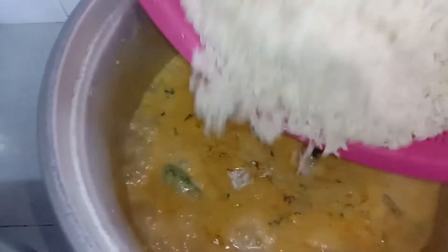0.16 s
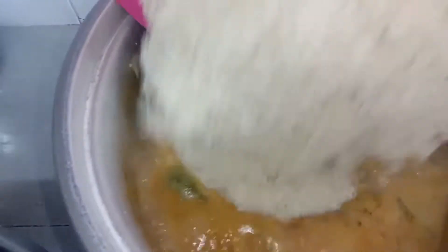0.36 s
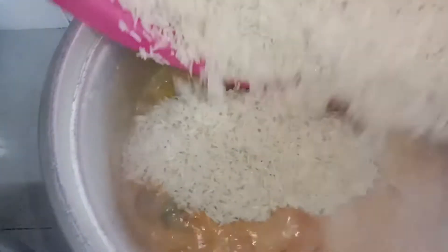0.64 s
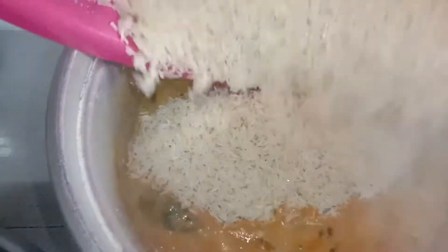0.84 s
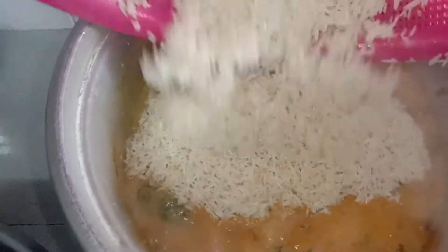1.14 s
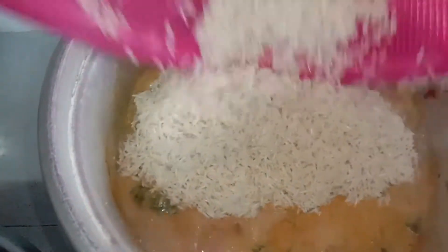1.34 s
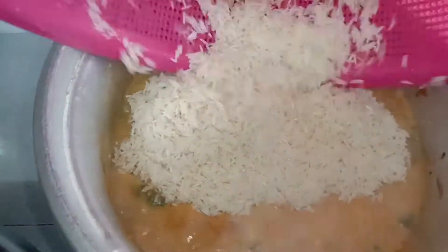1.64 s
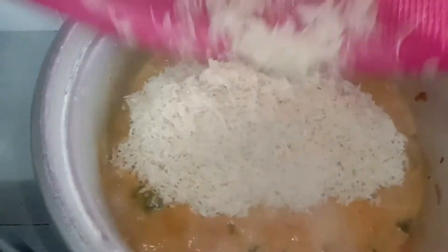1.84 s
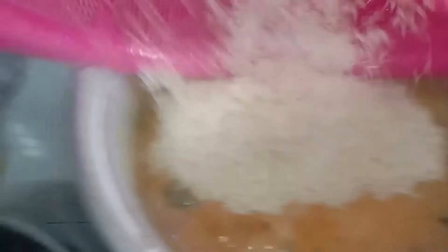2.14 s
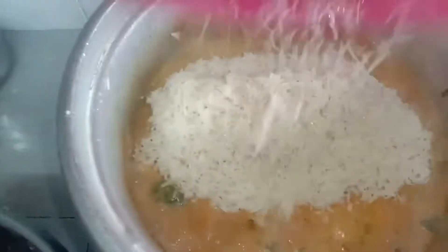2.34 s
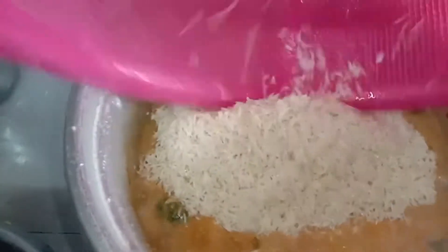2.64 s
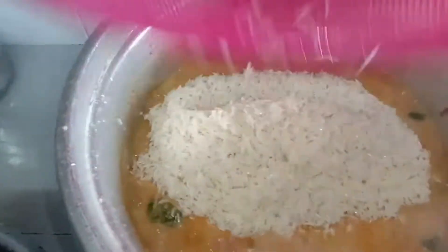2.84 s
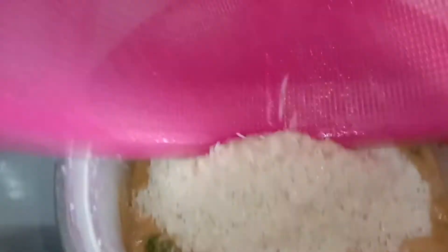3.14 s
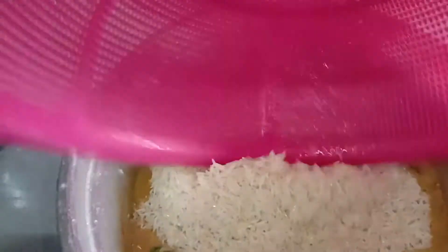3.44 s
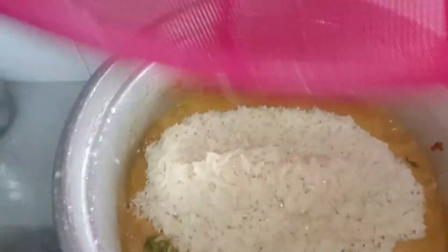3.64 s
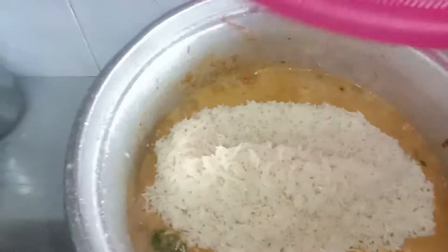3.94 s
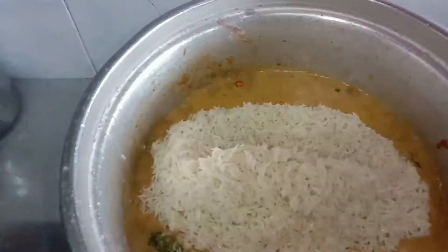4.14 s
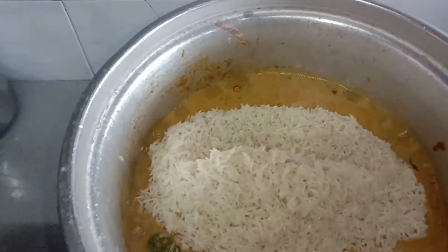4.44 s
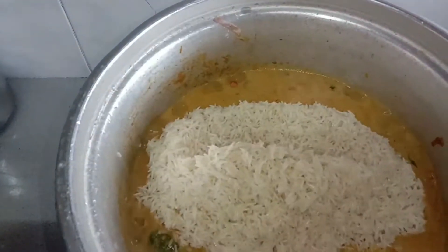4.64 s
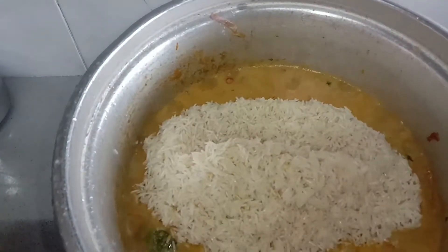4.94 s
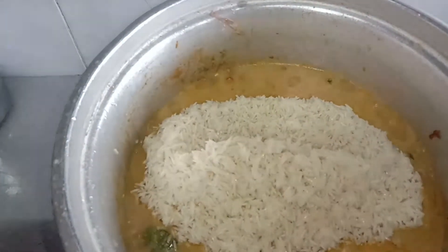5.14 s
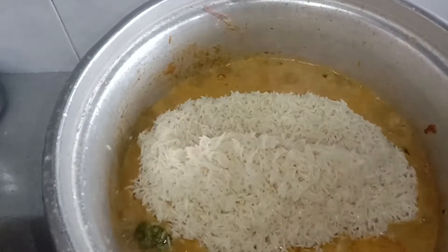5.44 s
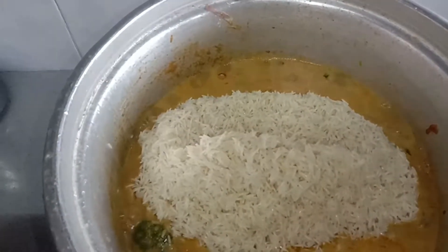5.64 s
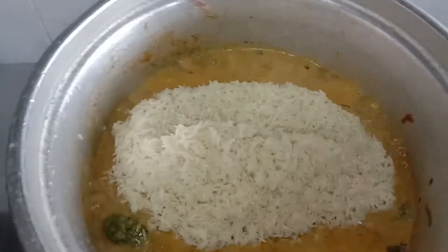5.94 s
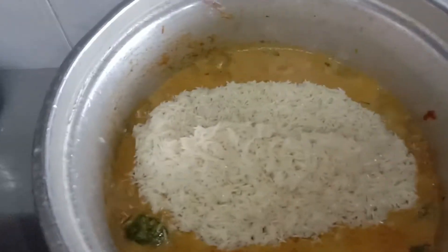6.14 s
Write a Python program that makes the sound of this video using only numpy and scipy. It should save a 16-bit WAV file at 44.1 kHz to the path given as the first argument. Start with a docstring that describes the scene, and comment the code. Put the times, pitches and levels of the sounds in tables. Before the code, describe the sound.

A plastic colander is knocked repeatedly on a metal pot as wet rice slides into boiling broth, then set down with a clatter.

```python
"""Knocking rice into boiling broth

Soaked rice slides from a plastic colander into a big metal pot of broth on a rushing gas flame.
The colander is knocked on the pot about four times a second; the knocks ring the pot and shake grains
loose. Then it is put down with a clatter in the small, echoing kitchen, while bubbles plop on."""
import sys
import numpy as np
from scipy import signal
from scipy.fft import rfft, irfft
from scipy.io import wavfile
from scipy.ndimage import uniform_filter1d, minimum_filter1d, map_coordinates

SR = 44100
rng = np.random.default_rng(int(sys.argv[2]) if len(sys.argv) > 2 else 0)


def waveform_to_disk(signal):
    """Save audio, clipped to [-1, 1], as 16-bit WAV at the path in sys.argv[1]."""
    frames = np.transpose(np.atleast_2d(signal))
    scaled = np.clip(frames, -1, 1) * 32767
    samples = np.round(scaled).astype(np.int16)
    wavfile.write(sys.argv[1], SR, samples)


N = 277385
T = np.arange(N) / SR

# Levels are relative: each sound is shaped further. A fade time (t60) is the time to fall by 60 dB.
# The kitchen's echo. Each row: frequency in Hz, fade time in seconds.
ECHO_FADES = [(100, 0.47), (400, 0.54), (1200, 0.52), (3000, 0.52), (7000, 0.47), (14000, 0.4)]
# The tone of each sound. Each row: frequency in Hz, level in dB.
FLAME_TONE = [(25, -40), (60, -14), (110, -14), (240, -7), (420, -2), (650, -6), (1250, -21), (1700, -12),
              (2900, -13), (4200, -19.5), (6300, -24), (7600, -25), (10500, -28), (15500, -52)]
CLATTER_TONE = [(45, -31), (125, -0.5), (260, 0.5), (700, 3.5), (1280, 6), (2200, -7), (2900, -5.5),
                (4300, -15), (5500, -16), (6500, -20.5), (10000, -30.5), (13000, -39), (15500, -36)]
SLIDING_RICE_TONE = [(150, -28), (300, -2.5), (430, 1.5), (620, -10), (1000, -5), (1270, -1.5),
                     (1550, -13.5), (3300, -5), (7000, -15), (10000, -15), (13000, -35), (15500, -63)]
GRAIN_TONE = [(300, -10), (1200, 9), (3000, -0.5), (5500, 4), (10000, -3.5), (13000, -7), (15500, -5.5)]
CRACK_TONE = [(35, -57), (60, -22.5), (335, 0.5), (688, -4), (1230, 4.5), (1550, -5), (3050, 3),
              (5580, -4.5), (6260, -4.5), (7370, -12), (9970, -15), (13500, -25.5), (15500, -27)]
CRACK_ECHO_TONE = [(40, -21.5), (120, 8), (260, -0.5), (520, 3), (800, 1), (1100, -1), (1280, 13.5),
                   (1500, -3), (2000, 2.5), (3000, 3.5), (5300, -1.5), (9500, -13), (13300, -24.5),
                   (15500, -26)]
MIC_TONE = [(4800, 0), (5600, 0.5), (6300, -1), (7200, 1.5), (10500, 2.7), (13500, -4.5), (15100, 4.5),
            (16000, -2), (19000, 0.5)]
# Bands of pitch that a thing favours or weakens. Each row: centre in Hz, width in Hz, level in dB.
HOLLOW_BANDS = [(428, 45, -61.5), (955, 45, -63.5), (1270, 90, -57.5)]  # hollows in and under the pot
FLUTTER_BANDS = [(84, 21, -12), (114, 20.5, -0.5), (161, 20, -4.5)]  # the flame's low flutter
BOWL_BANDS = [(1255, 73, 8), (1945, 64, 1.5), (2270, 80, -10), (3040, 170, -10), (5050, 180, -9),
              (5600, 290, -10.5), (7200, 370, -5)]  # the inside of the pot
PLASTIC_BANDS = [(1360, 54, -2), (1630, 80, -3), (2030, 40, 0), (2970, 100, 0), (3580, 40, 1),
                 (4770, 72, 1), (5410, 94, 1)]  # the colander being set down
MIC_DIPS = [(4450, 170, -2.5), (6230, 300, -4), (8010, 570, -6)]
# The notes a struck thing rings with. Each row: pitch in Hz, level in dB, fade time in seconds.
WORKTOP_NOTES = [(129, 0, 0.19), (307, -5, 0.14), (420, -13, 0.25), (560, -12, 0.12), (673, -8, 0.13)]
UTENSIL_NOTES = [(1710, 0.5, 0.16), (2700, -16.5, 0.29), (5040, -9, 0.057), (9100, -40, 0.16),
                 (10300, -41, 0.22)]
TAPPED_POT_NOTES = [(1933, -12, 0.13), (2300, -11, 0.08), (3020, 2, 0.036), (5000, -4.5, 0.04)]
KNOCKED_POT_NOTES = [(495, -8, .42), (925, -11, .3), (1038, -8, .38), (1288, -7, .36), (1660, -13, .4),
                     (1911, -8, .42), (1934, -1, .5), (2088, -12, .35), (2356, -1, .3), (2642, -11, .25),
                     (2702, -11, .25), (2983, -1, .32), (3182, -14, .5), (4070, -12, .45), (4883, -10, .28),
                     (5033, -11, .35), (5254, -11, .27), (5736, -13, .3), (6643, -13, .33)]
# How strongly the flame flutters. Each row: time in seconds, level in dB.
FLUTTER_LEVELS = [(0.0, -56.5), (0.52, -60), (0.8, -61), (3.45, -53), (3.77, -50), (3.91, -55), (4.68, -59),
                  (5.16, -57), (5.85, -49), (6.07, -52.5), (6.29, -71.5)]
# Short sounds with a pitch. Each row: start in seconds, level in dB, pitch in Hz, fade time in seconds.
PLOPS = [(0.062, -28.5, 880, 0.036), (0.071, -33, 2400, 0.025), (0.266, -26.5, 1145, 0.014),
         (3.769, -39, 810, 0.034), (3.948, -36, 775, 0.038), (4.011, -32, 670, 0.037),
         (4.017, -40.5, 1280, .025), (4.037, -35, 908, 0.09), (4.129, -33.5, 832, 0.13),
         (4.270, -38, 650, .03), (4.401, -37, 460, 0.065), (4.419, -35, 1420, 0.037),
         (4.423, -35, 610, 0.031), (4.754, -39, 830, 0.041), (5.457, -36, 740, 0.054),
         (5.819, -32, 800, 0.033), (5.826, -36, 1400, .03), (5.950, -33.5, 1196, 0.03),
         (5.958, -35, 860, 0.026), (6.059, -37, 710, 0.046), (6.071, -38, 940, .03),
         (6.092, -34, 1440, 0.03), (6.101, -33.5, 1740, 0.037), (6.1614, -18, 1174, 0.01),
         (6.183, -37, 1370, 0.023)]  # big bubbles bursting
SLOPS = [(0.645, -46.5, 1230, 0.13), (0.931, -23, 990, 0.34), (1.751, -27, 1090, 0.17),
         (3.99, -51.5, 680, 0.97), (4.113, -34, 1030, 0.2), (4.385, -46.5, 480, 0.23),
         (4.398, -47, 990, 0.2), (4.925, -34, 880, 0.15), (5.057, -34.5, 1320, 0.23),
         (5.938, -49, 900, 0.38), (6.016, -45.5, 534, 0.53), (6.088, -46, 1430, 0.16),
         (6.225, -44.5, 990, 0.19)]  # rice sinking in and broth boiling up
SIZZLES = [(3.912, -60.5, 3720, 0.2), (3.915, -67, 5500, 0.18), (3.965, -60.5, 5400, 0.22),
           (4.10, -60, 7600, .45), (4.255, -58, 3670, .2), (4.32, -68, 7300, .5), (4.54, -64, 5200, .4),
           (4.654, -64, 5400, 0.21), (4.66, -65, 7500, 0.16), (5.062, -60.5, 10200, 0.57),
           (5.851, -65.5, 5640, 0.5), (5.908, -60, 4400, .06), (5.952, -61, 4160, .07),
           (5.98, -57.5, 2750, 0.97), (5.985, -58, 3300, 0.33), (6.10, -60, 3840, 0.19),
           (6.182, -53, 2560, 0.071)]  # froth on the hot pot wall
BUMPS = [(4.919, -25.5, 564, 0.11), (5.113, -28, 680, .1), (5.123, -25, 124.6, 0.24),
         (5.168, -28.5, 296, .14), (5.205, -37.5, 421, .25), (5.24, -34, 285, .09), (5.642, -37, 421, .25),
         (5.678, -30, 725, .14)]  # hollow kitchenware being shifted
# Small single events. Each row: start in seconds, level in dB.
CLINKS = [(5.548, -25)]  # a utensil
LUMPS = [(0.297, -31), (0.34, -34), (0.429, -40), (0.527, -37), (0.596, -41), (0.9894, -29), (1.0034, -26),
         (1.009, -28), (1.039, -23.5), (1.066, -22.5), (1.08, -20), (1.168, -31), (1.259, -24.5),
         (1.2709, -24.5), (1.3212, -27.5), (1.349, -33), (1.404, -17), (1.458, -24.5), (1.511, -29),
         (1.529, -24), (1.54, -22), (1.553, -24), (1.576, -27), (1.59, -28.5), (1.605, -31), (1.614, -32),
         (1.7508, -17.5), (1.799, -28), (1.823, -26), (1.8282, -22.5), (1.843, -30), (1.873, -29.5),
         (1.989, -21), (2.009, -20), (2.025, -24), (2.054, -25), (2.061, -23), (2.104, -26), (2.267, -31),
         (2.311, -28), (2.3235, -24), (2.356, -30.5), (2.55, -28), (2.579, -19.5), (2.5858, -23)]  # wet lumps of rice landing
TAPS = [(0.297, -32.5)]  # light ticks on the pot
PUFFS = [(1.6433, 2.5), (2.4189, -1)]  # air from the colander hitting the microphone
# Things set down. Each row: start in seconds, then level, bass and treble in dB,
# fade time in seconds, then echo share and worktop level in dB.
SET_DOWNS = [(4.081, -46, 2, -6, 0.2, -12, -49), (4.838, -22, -27.5, 13.5, 0.23, -9, -44.5),
             (4.919, -25.5, -3, -28, 0.068, -2, -40), (5.113, -27.5, -2, 11, 0.16, -7.5, -35),
             (5.123, -27.5, 19.5, -5, 0.1, -2, -29.5), (5.173, -33.5, 14, 11, 0.11, -9, -38),
             (5.21, -25, 7, -2, 0.076, -11, -42), (5.244, -38, 3, -11, .068, -16, -36),
             (5.294, -33, 1.5, -4.5, 0.1, -7, -50), (5.317, -39, 10, -3, 0.048, -10, -46),
             (5.545, -22, -21, 1.5, 0.054, -12.5, -45), (5.562, -30, 15, 0, 0.16, -12, -40),
             (5.643, -37, 18.5, 0, 0.14, 6, -54), (5.679, -28.5, 0, -6, 0.23, -6.5, -37),
             (5.697, -21.5, 0, -3, 0.028, -21, -42)]
# Rustles of handling. Each row: start in seconds, level in dB, centre and width in Hz,
# fade time in seconds.
SCUFFS = [(4.079, -54, 11200, 7060, 0.19), (4.082, -48.5, 3500, 900, .12), (5.165, -33, 1810, 900, 0.13),
          (5.387, -46, 2900, 1840, 0.36), (5.558, -47.5, 8500, 3500, 0.14), (5.642, -56, 9000, 3000, 0.17)]
# The pot's rim when brushed. Each row: centre and width in Hz, level in dB, fade time in seconds.
RIM_BANDS = [(1300, 66, -43, 0.77), (1510, 110, -51, 0.33), (1790, 630, -50.5, 0.66),
             (2630, 200, -50.5, 0.61), (2970, 200, -45.5, 0.44), (3590, 81, -51, 0.35),
             (4040, 180, -52, .35), (4760, 520, -47.5, .4), (5470, 490, -52, 0.38),
             (7140, 850, -51.5, 0.38), (9600, 3100, -53, .35)]
# Wet rice giving way. Each row: start in seconds, level in dB, then rise, hold and fade times in seconds.
SLIDES = [(0, -44, 0.00067, 0.093, 0.082), (0.104, -52.5, 0.03, 0.19, 0.62), (0.286, -49.5, 0.072, 0.26, 1),
          (0.892, -39, 0.19, 0.15, 0.27)]
# The colander hits the pot and bounces. Each row: start in seconds, first hit in dB, time to the bounce
# in seconds, then in dB: bounce, tick compared with crack, echo, pot ring, rice shaken loose.
KNOCKS = [(0.8704, -36, 0.0037, -17.5, 10.5, -29.5, -38, -73),
          (1.1129, -28.5, 0.023, -17.5, 6, -29.5, -39, -58), (1.374, -37, 0.0058, -22, 21, -26.5, -33, -41),
          (1.640, -32.5, .0033, -16.5, 30, -21.5, -59, -34.5),
          (1.9106, -14, .0043, -12, 23.5, -20.5, -34, -41),
          (2.1279, -23, 0.021, -13.5, 18, -20, -30, -42.5), (2.4155, -34, .004, -18, 30, -21, -34.5, -43.5),
          (2.677, -26.5, 0.012, -16.5, 19.5, -22, -30.5, -71), (2.944, -16, 0.0032, -27, 26, -20, -24, -83),
          (3.1953, -8.5, 0.0079, -9, 22.5, -20.5, -31, -75)]


def undb(db):
    """Turn decibels into a number to multiply by."""
    return 10 ** (np.asarray(db) / 20)


def unit(x):
    """Scale a sound to an average (rms) level of 1."""
    return x / np.sqrt(np.mean(x ** 2))


def along(points, hz):
    """Read between (Hz, value) points, with octaves evenly spaced."""
    freqs, values = np.transpose(points)
    return np.interp(np.log(hz + 1), np.log(freqs), values)


def add(out, start_s, x):
    """Mix x into out at the given time."""
    i = max(int(start_s * SR), 0)
    out[i:i + len(x)] += x[:max(len(out) - i, 0)]


def fade(t60):
    """One second of a level dying away."""
    return np.exp(-np.log(1000) * T[:SR] / max(t60, 1e-3))


def swell(rise_s, hold_s, t60):
    """One second of a level that rises, stays up until hold_s and dies away."""
    t = T[:SR]
    fading_s = np.maximum(t - max(hold_s, rise_s), 0)
    return np.minimum(t / rise_s, 1) * np.exp(-np.log(1000) * fading_s / t60)


def waver(rate):
    """A random drift that turns about rate times a second."""
    step = int(SR / rate)
    stairs = np.repeat(rng.standard_normal(N // step + 1), step)
    return unit(uniform_filter1d(stairs, step)[:N])


def colour(x, tone, size=4096):
    """Shape a sound with a tone table; white noise would keep its power."""
    cepstrum = irfft(along(tone, np.arange(size // 2 + 1) * SR / size) * np.log(10) / 20)
    # keeping only the first half stops the filter from ringing ahead of the sound
    response = irfft(np.exp(rfft(2 * cepstrum[:size // 2], size) - cepstrum[0]))
    return signal.fftconvolve(x, response / np.linalg.norm(response))[:len(x)]


def resonate(x, hz, width_hz):
    """Keep the part of a sound near one pitch."""
    return signal.lfilter(*signal.iirpeak(hz, hz / width_hz, SR), x)


def band(x, hz, width_hz):
    """Like resonate, with steeper edges."""
    return resonate(resonate(x, hz, width_hz), hz, 2 * width_hz)


def ring(hz, t60, glide=0.):
    """A fading pure note whose pitch rises by the share glide as it dies."""
    t = T[:int(min(max(t60, .002), 1) * 1.3 * SR)]
    return np.sin(2 * np.pi * hz * t * (1 + glide * t / t60 / 2)) * np.exp(-np.log(1000) * t / t60)


def burst(t60, spike=0.):
    """A hit: an optional spike, then fading noise, with the energy of 10 ms at level 1."""
    x = rng.standard_normal(SR) * fade(t60)
    x = x / np.linalg.norm(x)
    x[0] = spike
    return x * np.sqrt(SR // 100) / np.linalg.norm(x)


def strike_spot():
    """A random strength for one note: each blow lands elsewhere and favours other notes."""
    return rng.uniform(2 / 3, 4 / 3) * rng.choice([-1, 1])


def patter(rate, spread_db, size=N):
    """Tiny random hits of uneven strength, about rate of them a second."""
    strengths = undb(spread_db * np.minimum(rng.exponential(size=size), 4))
    return unit((rng.random(size) < rate / SR) * strengths * rng.choice([-1, 1], size))


def crackle(hz, width_hz, rise_s, t60):
    """A short swell of dense crackle around one pitch."""
    hits = patter(rate=4000, spread_db=1, size=SR)
    return unit(band(hits, hz, width_hz)) * swell(rise_s, 0, t60)


def clumpy(x, swing_db, rate, width_hz, size=512):
    """Make a stream uneven: its bands of pitch come and go, and its whole level wavers."""
    spectrum = signal.stft(x, nperseg=size)[2]
    row, column = np.indices(spectrum.shape)
    place = [row * SR / size / width_hz, column * size / 2 / SR * rate]
    patches = map_coordinates(rng.standard_normal((size, 2 * size)), place, order=1)
    gain = unit(undb(swing_db * unit(patches)))
    return signal.istft(spectrum * gain, nperseg=size)[1][:N] * undb(1.4 * waver(25.07))


def echo(build_s=0.02):
    """The echo of one click: it builds up as the walls answer, and the treble dies first."""
    noise, tail = rfft(rng.standard_normal(SR)), 0
    row_at_hz = along([(hz, row) for row, (hz, _) in enumerate(ECHO_FADES)], np.arange(SR // 2 + 1))
    for row, (_, t60) in enumerate(ECHO_FADES):
        share = np.maximum(1 - np.abs(row_at_hz - row), 0)
        tail = tail + irfft(noise * share, SR) * fade(t60)
    tail = tail * (1 - np.exp(-(T[:SR] / build_s) ** 2))
    return tail / np.linalg.norm(tail)


def kitchen(x):
    """What the hard kitchen walls send back of a sound."""
    return signal.fftconvolve(x, echo())[:N]


def body(x, bands):
    """A hollow thing boosts its own bands of pitch in a sound."""
    return x + sum(undb(db) * resonate(x, hz, width_hz) for hz, width_hz, db in bands)


def burner():
    """The gas flame rushes, flutters low and sounds the hollows in and under the pot."""
    rush = undb(-61) * unit(colour(rng.standard_normal(N), FLAME_TONE))
    for hz, width_hz, db in HOLLOW_BANDS:
        unsteady = undb(3.5 * waver(18))
        rush += undb(db) * unit(band(rng.standard_normal(N), hz, width_hz)) * unsteady
    flutter = sum(undb(db) * unit(band(rng.standard_normal(N), hz, width_hz))
                  for hz, width_hz, db in FLUTTER_BANDS)
    flutter_db = 1 + np.interp(T, *np.transpose(FLUTTER_LEVELS))
    return rush + undb(flutter_db) * unit(flutter)


def broth(bubbles=700, simmer_db=-59, hiss_db=-74.5, stilled_db=-14):
    """Bubbles burst with short rising notes, and froth slops and sizzles on the hot pot wall."""
    simmer, boil = np.zeros((2, N))
    for when, pitch, size, length in rng.random((bubbles, 4)):
        hz = 360 * 4. ** pitch
        add(simmer, when * N / SR, undb(5.2 * size ** 2) * ring(hz, (6 + 12 * length) / hz, glide=0.24))
    for start, db, hz, t60 in PLOPS:
        add(boil, start, undb(db) * resonate(ring(hz, t60, glide=0.18), hz, 1.4 * hz))
        spit = band(burst(t60=0.067), hz, 0.27 * hz)  # the bubble's skin tears
        add(boil, start, undb(db - 4) * body(spit, BOWL_BANDS))
    for start, db, hz, t60 in SLOPS:
        slop = crackle(hz, 0.52 * hz, rise_s=0.0047, t60=t60)
        froth = crackle(hz=2780, width_hz=400, rise_s=0.0047, t60=0.23)
        add(boil, start, undb(db) * (slop + undb(-11.5) * froth))
    for start, db, hz, t60 in SIZZLES:
        add(boil, start, undb(db) * crackle(hz, 0.13 * hz, rise_s=0.0057, t60=t60))
    hiss = band(patter(rate=4700, spread_db=6.5), hz=6600, width_hz=8700)
    hiss = clumpy(body(hiss, BOWL_BANDS), swing_db=6, rate=9, width_hz=330)
    hiss = unit(hiss) * undb(hiss_db + 5.5 * waver(9.4))
    # the cold rice calms the simmer and the hiss for a while
    stilled = uniform_filter1d(1. * ((T > 0.94) & (T < 3.32)), SR // 2)
    direct = (undb(simmer_db) * unit(simmer) + hiss) * undb(stilled_db * stilled) + boil
    return direct + undb(-13) * kitchen(direct)


def clatter():
    """Kitchenware is set down on the hollow worktop, with bumps, a clink and scuffs."""
    direct, to_walls = np.zeros((2, N))
    for start, db, bass_db, treble_db, t60, echo_db, worktop_db in SET_DOWNS:
        tone = [(150, bass_db), (550, 0), (1500, 0), (5000, treble_db)]
        hit = colour(colour(burst(t60), tone), CLATTER_TONE)
        hit = body(hit, PLASTIC_BANDS)
        hit *= 1.19 * undb(db) * np.linalg.norm(fade(t60)) / np.linalg.norm(hit)
        for hz, note_db, note_t60 in WORKTOP_NOTES:
            add(hit, 0, strike_spot() * undb(worktop_db + note_db) * ring(hz, note_t60))
        add(direct, start, hit)
        add(to_walls, start, undb(echo_db) * hit)
    for start, db, hz, t60 in BUMPS:
        bump = undb(db) * resonate(ring(hz, t60), hz, hz / 2)
        add(direct, start, bump)
        add(to_walls, start, undb(-8.5) * bump)
    for start, db in CLINKS:
        for hz, note_db, t60 in UTENSIL_NOTES:
            add(direct, start, undb(db + note_db) * ring(hz, t60))
    for start, db, hz, width_hz, t60 in SCUFFS:
        add(direct, start, undb(db) * crackle(hz, width_hz, rise_s=0.0078, t60=t60))
    return direct + kitchen(to_walls)


def graze(start_s=3.567):
    """The colander brushes the rim as it is lifted, and the pot answers with a ringing scrape."""
    out = np.zeros(N)
    for hz, width_hz, db, t60 in RIM_BANDS:
        add(out, start_s, undb(db) * crackle(hz, width_hz, rise_s=0.0078, t60=t60))
    return out


def wet_grains(flow, count=2400, low_hz=2000, high_hz=14000, range_db=14):
    """Single grains slap down, each a brief spatter with its own pitch, as strong as the flow."""
    out = np.zeros(N)
    dying = fade(t60=.009)[:SR // 100]
    for when, pitch, size in rng.random((count, 3)):
        hz = low_hz * (high_hz / low_hz) ** pitch
        spatter = resonate(rng.standard_normal(len(dying)) * dying, hz, hz / 2)
        add(out, when * N / SR, unit(spatter) * undb(range_db * size ** 2))
    return unit(out) * flow


def rice():
    """Wet rice slides out with a hollow rustle, lumps land, and knocks shake down showers of grains."""
    pour, showers = np.zeros((2, N))
    for start, db, rise_s, hold_s, t60 in SLIDES:
        add(pour, start, undb(db) * swell(rise_s, hold_s, t60))
    for start, *_, rice_db in KNOCKS:
        add(showers, start, undb(rice_db) * swell(rise_s=0.063, hold_s=0.15, t60=0.23))
    rustle = colour(patter(rate=12000, spread_db=3), SLIDING_RICE_TONE)
    rustle = clumpy(body(rustle, BOWL_BANDS), swing_db=3.5, rate=14, width_hz=260)
    rustle *= undb(-0.5) * pour + undb(-2.5) * showers
    grains = wet_grains(undb(-14) * pour + undb(-1.5) * showers)
    for start, db in LUMPS:
        add(grains, start, undb(db - 12.5) * burst(t60=.022, spike=.35))
    direct = rustle + colour(grains, GRAIN_TONE)
    return direct + undb(-11) * kitchen(direct)


def thumps(thud_fall_db_per_s=20, boom_rise_db_per_s=7.5):
    """The colander puffs air as it flexes; as it empties, it thuds less and booms more freely."""
    thuds, booms, puffs = np.zeros((3, N))
    # a sudden push of air that swings out in a few slow waves
    push = np.cos(2 * np.pi * 93 * T[:SR] + np.pi / 3) * fade(0.033) + fade(0.0057)
    push = signal.sosfilt(signal.butter(2, [35, 1100], "bandpass", fs=SR, output="sos"), push)
    for start, _, gap_s, *_ in KNOCKS:
        elapsed_s = start - KNOCKS[0][0]
        add(thuds, start + gap_s, undb(-23.5 - thud_fall_db_per_s * elapsed_s) * ring(hz=252, t60=0.082))
        add(booms, start, undb(-37 + boom_rise_db_per_s * elapsed_s) * push)
    for start, db in PUFFS:
        add(puffs, start, undb(db) * push)
    return thuds + puffs + undb(5) * booms + kitchen(booms)


def knocks(far_wall_s=.0044, far_wall_db=-11):
    """Hard plastic cracks against the pot and bounces; the pot rings and the kitchen answers."""
    ticks, cracks, echoes, pot = np.zeros((4, N))
    for start, first_db, gap_s, bounce_db, tick_db, echo_db, ring_db, _ in KNOCKS:
        for when, db in (start, first_db), (start + gap_s, bounce_db):
            # each hit is one bright tick, then the plastic buzzes briefly
            add(ticks, when, undb(db + tick_db) * np.array([1, -1 / 2]))
            add(cracks, when, undb(db) * burst(t60=.014, spike=.7))
            add(echoes, when, undb(echo_db + 1) * burst(t60=0.096))  # rattling round inside the pot
            add(echoes, when, undb(echo_db + 25.5) * echo())  # off the kitchen walls
        for hz, note_db, t60 in KNOCKED_POT_NOTES:
            add(pot, start + gap_s, strike_spot() * undb(ring_db + note_db) * ring(hz, t60))
    for start, db in TAPS:
        for hz, note_db, t60 in TAPPED_POT_NOTES:
            add(pot, start, undb(db + note_db) * ring(hz, t60))
    ticks = signal.sosfilt(signal.butter(6, 9500, fs=SR, output="sos"), ticks)
    # each crack comes back once off the far wall of the pot
    far_wall = np.array([1] + [0] * int(far_wall_s * SR) + [undb(far_wall_db)])
    cracks = signal.fftconvolve(cracks, far_wall)[:N]
    return ticks + colour(cracks, CRACK_TONE) + colour(echoes, CRACK_ECHO_TONE) + pot


def scene():
    """Everything at the stove, in one channel."""
    return (knocks() + thumps() + graze() + rice() + broth() + clatter() + burner())[None]


def limiter(x, size=1100):
    """Turn the level down around every peak over 1 and round off what is left."""
    gain = 1 / np.maximum(np.abs(x), 1)
    smooth_gain = uniform_filter1d(minimum_filter1d(gain, size), size // 2)
    return 1.3 * np.tanh(x * smooth_gain / 1.3)


def record(dry):
    """The phone colours the treble, thins the deepest bass, tames the cracks and cuts the highest hiss."""
    sound = colour(dry[0], MIC_TONE)
    for hz, width_hz, db in MIC_DIPS:
        sound = sound + (undb(db) - 1) * resonate(sound, hz, width_hz)
    thinned = signal.sosfilt(signal.butter(2, 42, "highpass", fs=SR, output="sos"), sound[None])
    return signal.sosfilt(signal.ellip(8, .2, 70, 15800, fs=SR, output="sos"), limiter(thinned))


dry = scene()
out = record(dry)
waveform_to_disk(out)
```